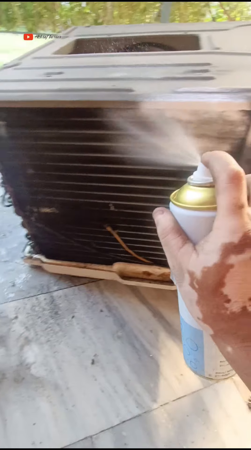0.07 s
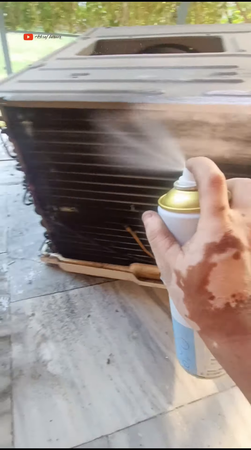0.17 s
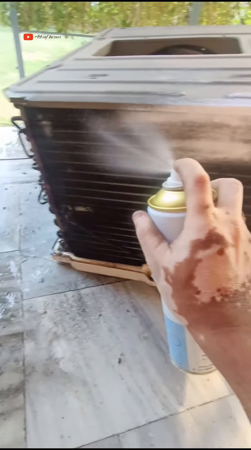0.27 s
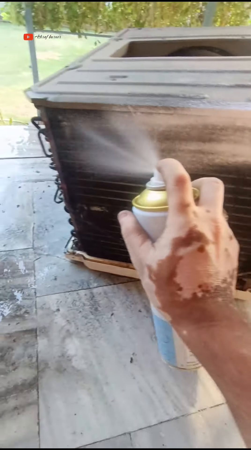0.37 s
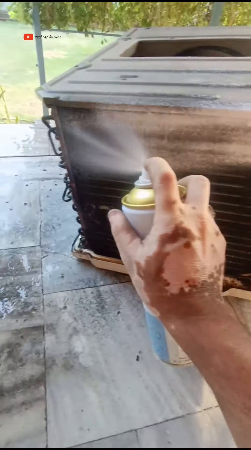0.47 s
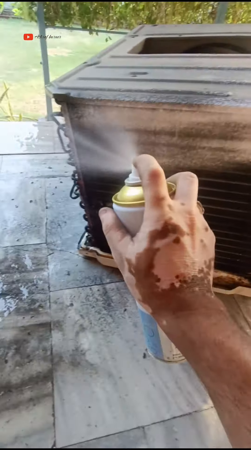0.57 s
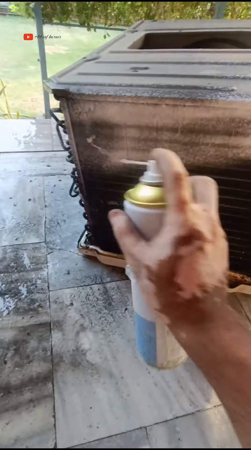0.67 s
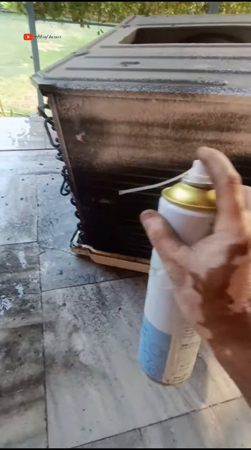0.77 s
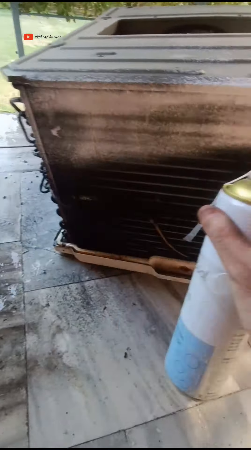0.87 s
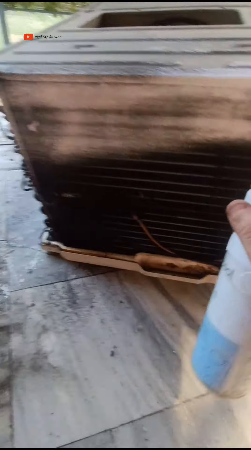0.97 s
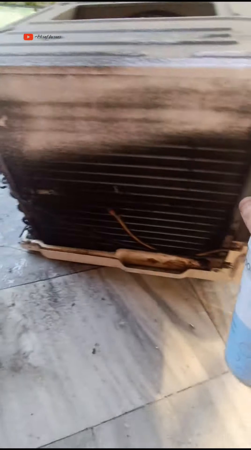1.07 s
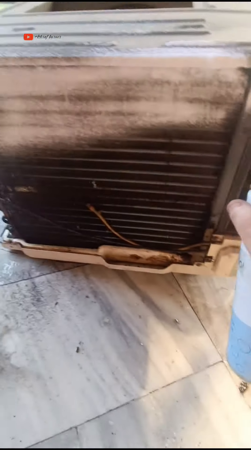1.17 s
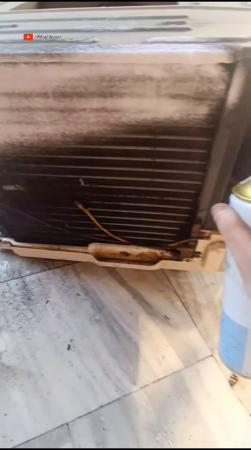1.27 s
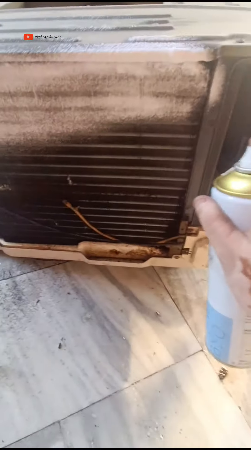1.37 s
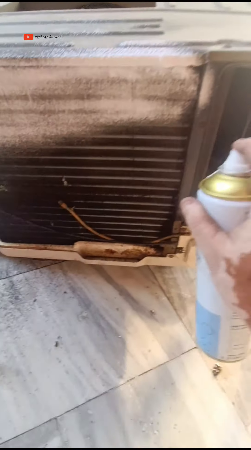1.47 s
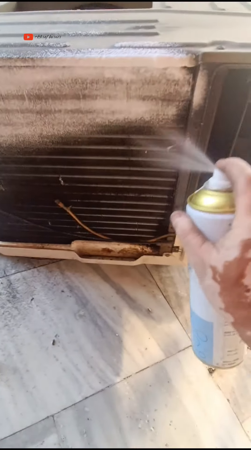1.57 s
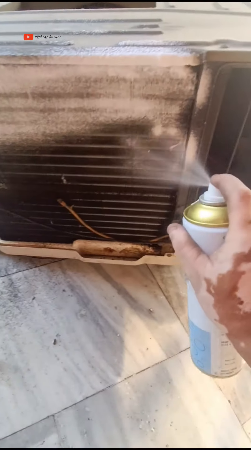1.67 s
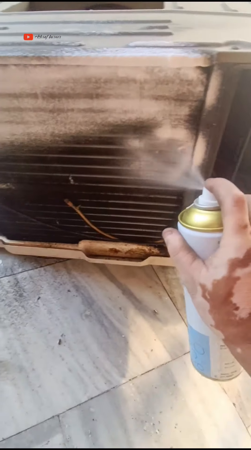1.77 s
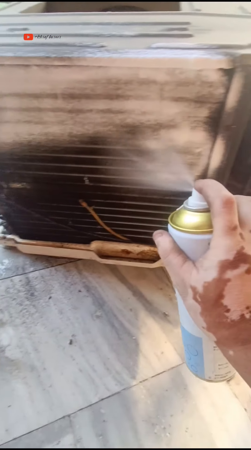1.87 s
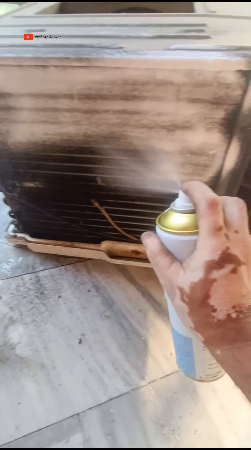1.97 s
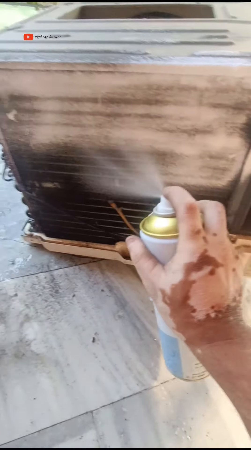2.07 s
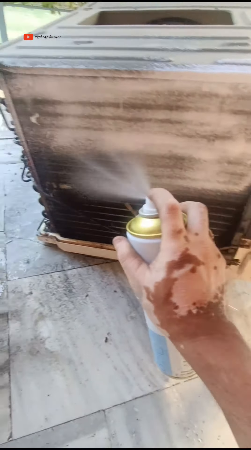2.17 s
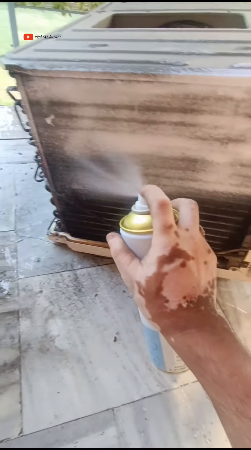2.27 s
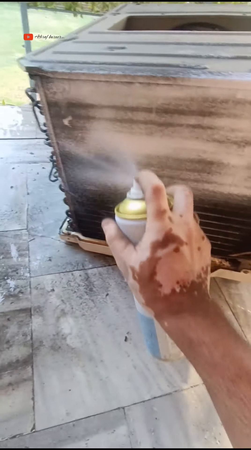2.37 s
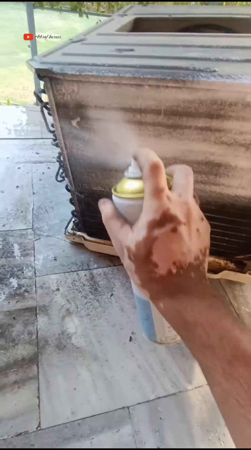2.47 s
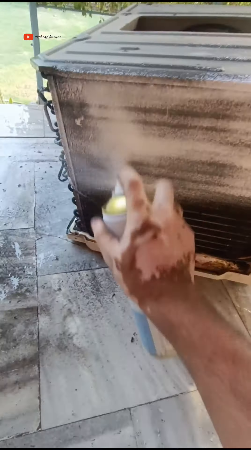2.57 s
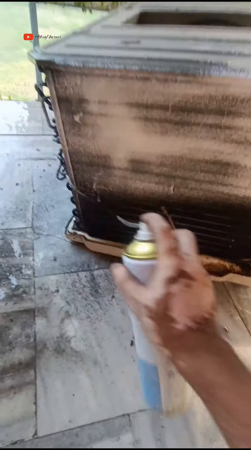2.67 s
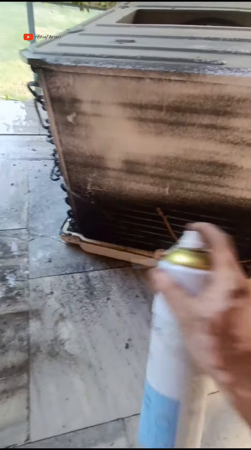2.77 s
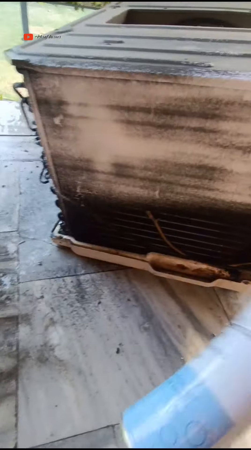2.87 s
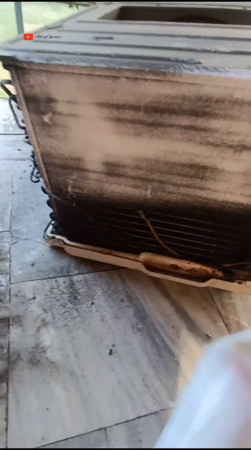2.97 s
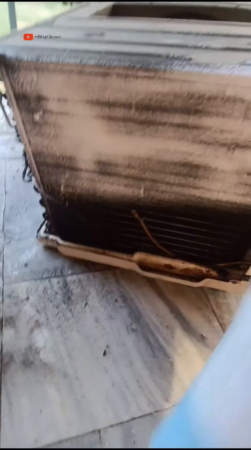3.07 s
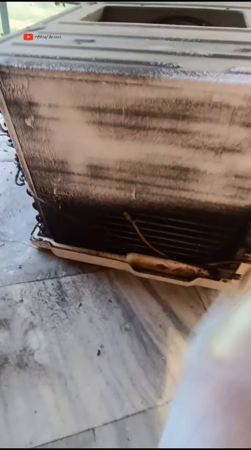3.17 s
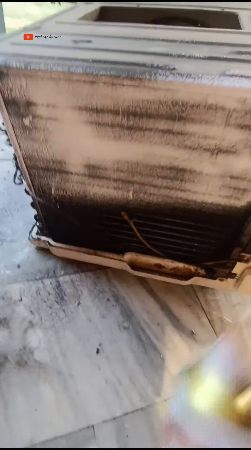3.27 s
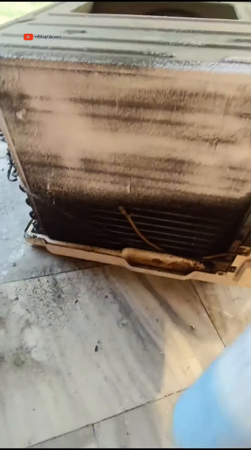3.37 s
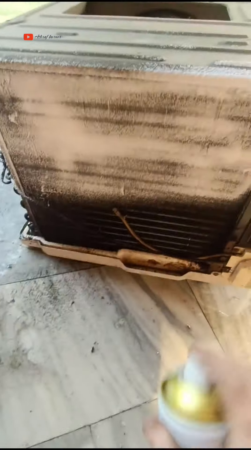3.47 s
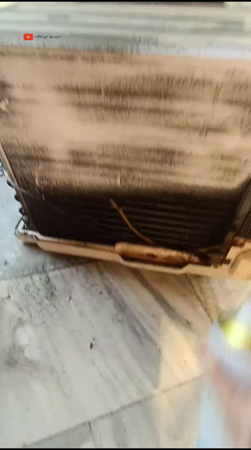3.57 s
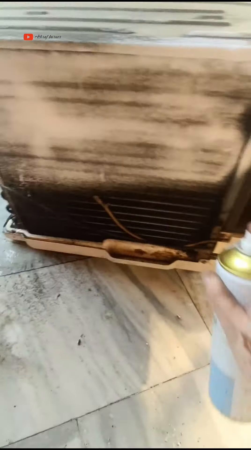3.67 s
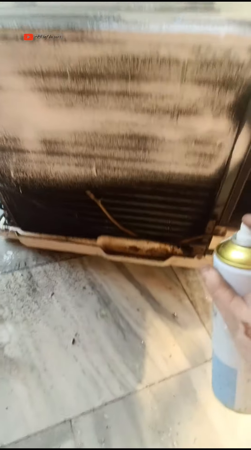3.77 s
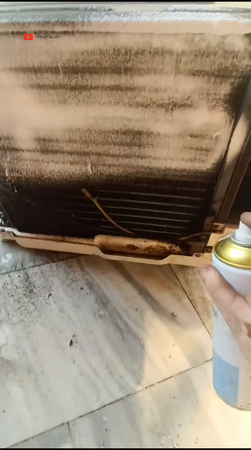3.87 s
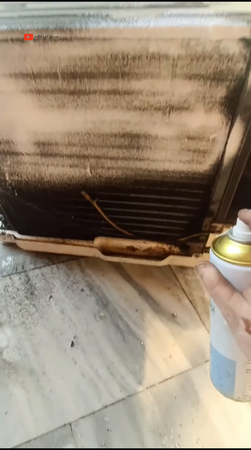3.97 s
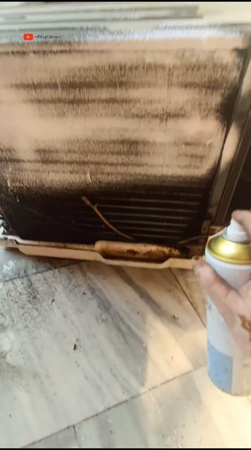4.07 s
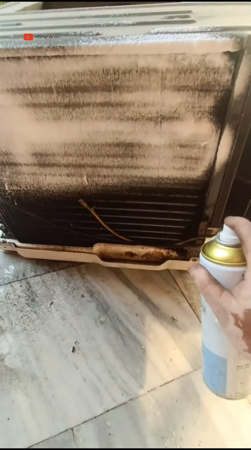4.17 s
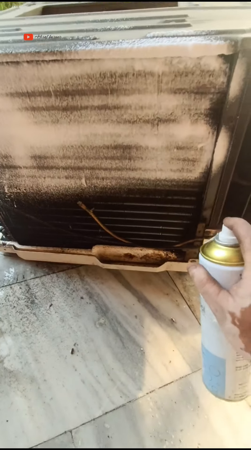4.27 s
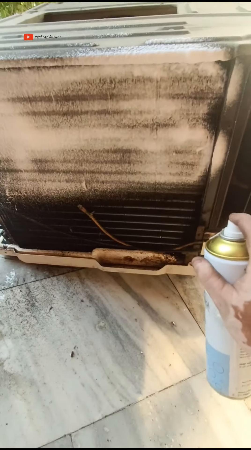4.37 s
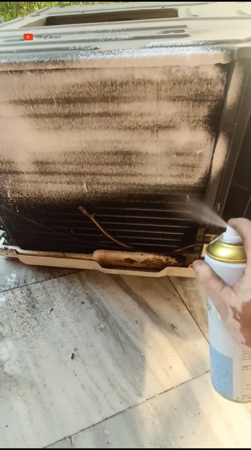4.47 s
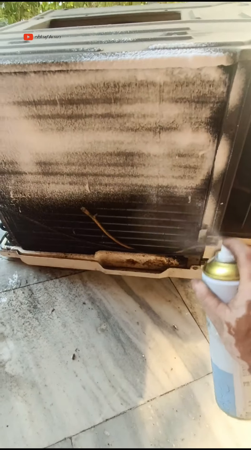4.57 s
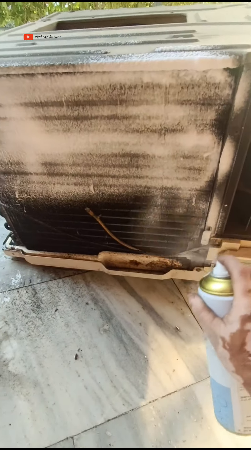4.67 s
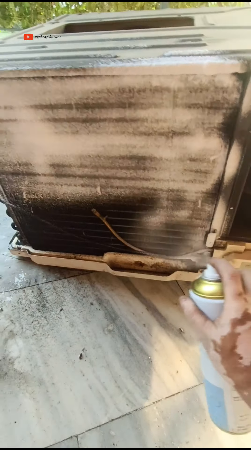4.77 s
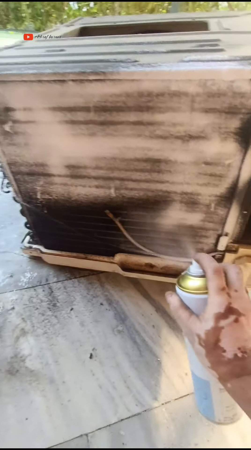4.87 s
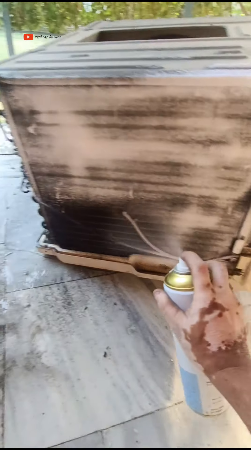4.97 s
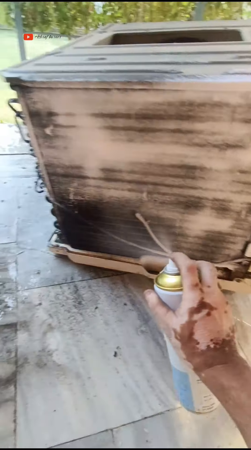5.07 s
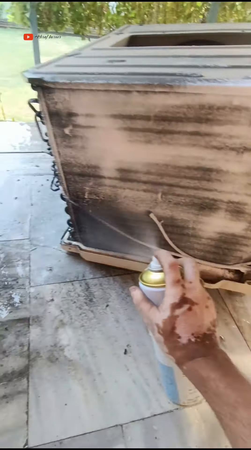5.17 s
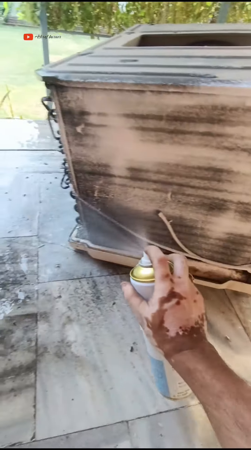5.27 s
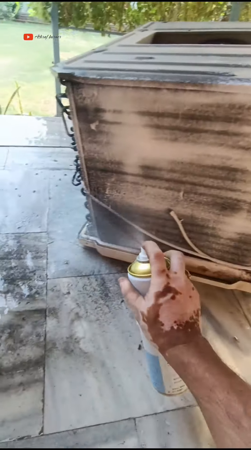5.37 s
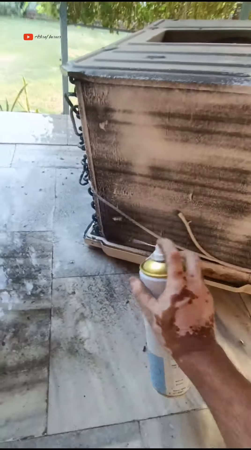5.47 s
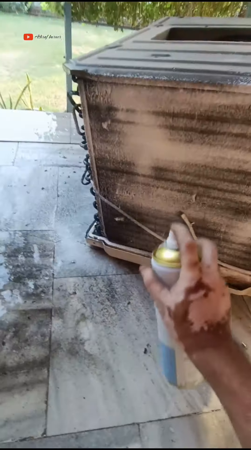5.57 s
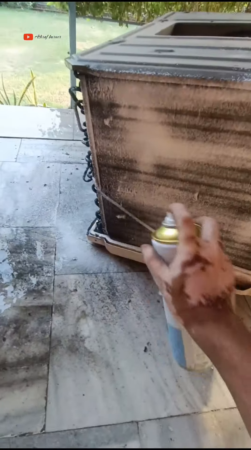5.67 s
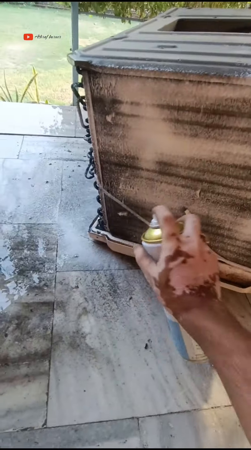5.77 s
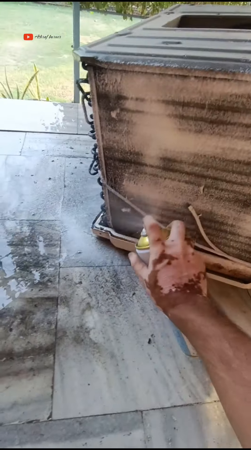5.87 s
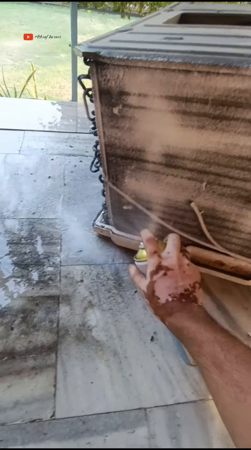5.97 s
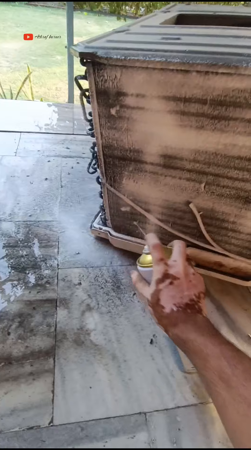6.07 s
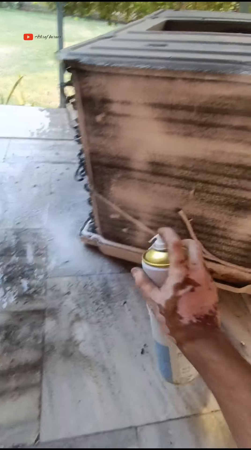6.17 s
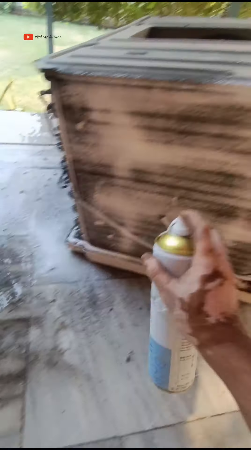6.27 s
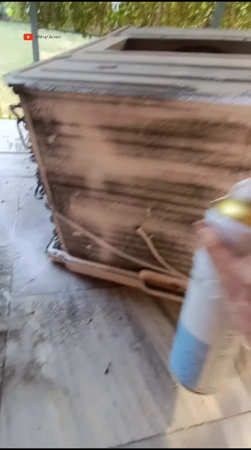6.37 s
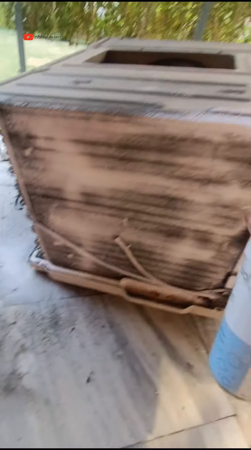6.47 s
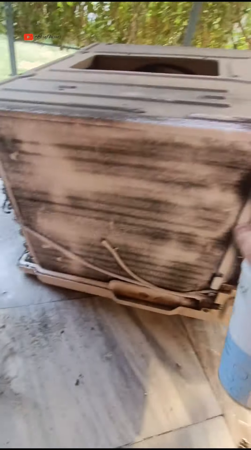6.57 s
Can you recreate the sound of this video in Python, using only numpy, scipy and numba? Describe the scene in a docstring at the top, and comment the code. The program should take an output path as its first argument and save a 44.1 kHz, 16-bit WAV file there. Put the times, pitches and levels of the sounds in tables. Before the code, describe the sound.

Close outdoor phone pickup with a steady low rumble of distant town traffic and a few very faint bird chirps. An aerosol can is already spraying at 0 s: a bright, airy, slightly sputtering hiss, with a quick whistle sliding downward in the first 0.13 s. It weakens gradually and cuts off near 0.8 s. Light ticks lead to a sharp steel ball clack around 0.97 s, then only the rumble. At 1.7 s a spit of liquid opens a second, steady hiss lasting until 2.76 s. From about 3.0 to 4.25 s the can is shaken: uneven metallic rattles and liquid patter, with the loudest cracks at 3.19 and 3.45 s and duller knocks near 3.8 and 4.05 s. A third hiss, spitting at its start, runs from 4.6 to 5.55 s. A brief soft puff follows from 5.98 to 6.2 s, leaving quiet rumble until 6.6 s. Short diffuse reflections trail the can sounds.

```python
"""Outdoors, over a low town rumble and a few faint birds, an aerosol can sprays foam onto a finned coil.
The first burst is under way at the start, its jet a shaped noise with a gliding valve whistle. The can is
then shaken: its ball strikes the steel wall and rings damped modes. A second burst, a longer shaking and two
more bursts follow. A diffuse tail surrounds the can, an arm's length right of a two-port phone."""
import sys
import numpy as np
from scipy import signal
from scipy.fft import rfft, irfft, next_fast_len
from scipy.io import wavfile
from scipy.ndimage import uniform_filter1d, map_coordinates
from numba import njit

SR = 44100
rng = np.random.default_rng(int(sys.argv[2]) if len(sys.argv) > 2 else 0)


def dump_mix(stems):
    """Bounce the given channels to the path in sys.argv[1] as a 16-bit WAV at rate SR."""
    frames = np.atleast_2d(stems).T  # one column per channel
    limited = np.clip(frames, -1, 1)  # hard clip at full scale
    pcm = np.round(limited * 32767).astype(np.int16)
    wavfile.write(sys.argv[1], SR, pcm)


N = 292383
TIME, SIZE = np.arange(N) / SR, next_fast_len(N)
FREQ = np.maximum(np.arange(SIZE // 2 + 1) * SR / SIZE, 1)

# Swings of the can. Each row: start in seconds, end in seconds, treble tilt of the knocks in dB per octave,
# bass tilt in dB per octave (both for a usual blow), liquid level in dB, mean level of small ticks in dB.
SWINGS = [(.80, 0.966, -2.5, -23, -60, -44), (3.063, 3.16, -5, -10, -49, -33),
          (3.177, 3.383, -7, -7, -48, -35), (3.435, 3.56, -9.5, -3.5, -50, -33),
          (3.685, 3.73, -14.5, -1, -60, -42), (3.766, 3.991, -10.5, -6, -49.5, -32),
          (4.038, 4.26, -16, -7.5, -53, -32.5)]


def undb(db):
    """Level in decibels to amplitude ratio."""
    return 10 ** (np.asarray(db) / 20)


def along(table):
    """Spectrum interpolation: a (Hz, value) table read on a logarithmic frequency axis."""
    hz, value = np.transpose(table)
    return np.interp(np.log(FREQ), np.log(hz), value)


def noise(gain, channels=1):
    """Spectral shaping: white noise weighted by a gain at each frequency, scaled to rms 1."""
    white = rng.standard_normal((channels, SIZE))
    shaped = irfft(rfft(white) * gain, SIZE)[:, :N]
    return shaped / np.sqrt(np.mean(shaped ** 2))


def bell(hz, octaves):
    """Band-pass response: a Gaussian on the octave scale around a centre."""
    return np.exp(-.5 * (np.log2(FREQ / hz) / octaves) ** 2)


def walk(rate):
    """Slow random modulation: levels held 1 / rate seconds and smoothed twice, spread near 1."""
    hold = int(SR / rate)
    steps = np.repeat(rng.standard_normal(N // hold + 1), hold)
    smooth = uniform_filter1d(uniform_filter1d(steps, hold), hold)
    return 1.3 * smooth[:N]


def ports(shared, apart, lead_s, alike):
    """Arrival time and partial coherence: the left port hears the source earlier, partly by another path."""
    alike = np.clip(alike, 0, 1)
    ahead = np.round(lead_s * SR).astype(int)
    early = shared[np.clip(np.arange(N) + ahead, 0, N - 1)]
    return np.array([alike * early + np.sqrt(1 - alike ** 2) * apart, shared])


def sides(pan_db):
    """Interaural level difference: left and right gains for left minus right in dB."""
    return undb(np.array([pan_db, -pan_db]) / 2)


@njit
def duck(x, top, ratio, attack, release):
    """Dynamic compression: gain falls quickly when the envelope passes a level and recovers slowly."""
    gain, envelope = np.ones(len(x)), 0.
    for i in range(len(x)):
        envelope += (x[i] - envelope) * (attack if x[i] > envelope else release)
        if envelope > top:
            gain[i] = (top / envelope) ** (1 - 1 / ratio)
    return gain


def town():
    """Diffuse field of traffic and machines: octave bands swell independently, alike at both ports in the bass."""
    # Spectrum of the rumble. Each row: frequency in Hz, relative level in dB per Hz.
    town_spectrum = [(15, -56), (25, -11.5), (96, -4.5), (140, -9), (183, -3), (240, -8.5), (433, -13.5),
                     (509, -21.5), (1140, -25), (2300, -32), (2770, -35), (3830, -35.5), (5730, -51),
                     (8810, -61.5), (15500, -86.5)]
    # Coherence of the ports. Each row: frequency in Hz, likeness of left and right from -1 to 1.
    likeness = [(60, 0.98), (130, 0.99), (290, 0.92), (640, 0.45), (1410, -0.053), (3100, 0.12),
                (6820, -0.2), (15000, 0.2)]
    # Swell of the whole rumble. Each row: time in seconds, level change in dB.
    swell = [(0, 0), (1, 0.5), (1.6, 2.5), (2.3, 2), (3, 0), (4, 0), (5, 1), (5.8, 0), (6.63, 0)]
    level_db = -38.5
    alike = np.clip(along(likeness), -.95, .995)
    spectrum = undb(along(town_spectrum))
    out = 0
    for k in range(10):
        # overlapping bands, one octave apart from 30 Hz
        gain = spectrum * np.cos(np.pi / 2 * np.clip(np.log2(FREQ / 30) - k, -1, 1))
        white = rfft(rng.standard_normal((2, SIZE)))
        mid, side = irfft(white * gain * np.sqrt([1 + alike, 1 - alike]), SIZE)[:, :N]
        band_swell = undb(1.0 * walk(1.5) + 0.87 * walk(9))
        out = out + band_swell * np.array([mid + side, mid - side])
    level = undb(level_db + np.interp(TIME, *np.transpose(swell)))
    return out * level / np.sqrt(np.mean(out ** 2))


def birds():
    """Frequency modulation: far, thin gliding tones, their pitch and level blurred by leaves and air."""
    # Far calls. Each row: start in seconds, length in seconds, start pitch in Hz, end pitch in Hz,
    # mean level in dB, blur as a share of pitch.
    calls = [(1.307, 0.15, 5500, 5900, -69.5, .04), (2.964, 0.092, 5660, 5650, -63, 0.022),
             (6.19, 0.19, 1626, 1624, -58.5, 0.037), (6.32, 0.31, 6680, 6700, -71.5, 0.011),
             (6.57, 0.055, 2310, 2300, -57, 0.017)]
    out = np.zeros((2, N))
    waver, flutter = walk(500), walk(150)
    for start, length_s, start_hz, end_hz, db, blur in calls:
        part = np.clip((TIME - start) / length_s, 0, 1)
        pitch = (start_hz + (end_hz - start_hz) * part) * (1 + blur * waver)
        phase = 2 * np.pi * np.cumsum(pitch) / SR
        envelope = np.abs(np.sin(np.pi * part)) ** 0.27 * (part < 1)
        out += undb(db + 3.5 * flutter) * envelope * np.sin(phase)
    return out


def yard(dry):
    """Diffuse reverberation: fins, paving and wall return a decaying noise tail, another one to each port."""
    t60_s, level_db = 0.39, -12
    t = np.arange(int(.5 * SR)) / SR
    tail = rng.standard_normal((2, len(t))) * np.exp(-np.log(1000) * t / t60_s) * (t > .004)
    # the treble dies sooner
    dull = signal.lfilter([.4], [1, -.6], tail)
    tail = dull + (tail - dull) * np.exp(-t / 0.045)
    tail = tail / np.sqrt((tail ** 2).sum(axis=1, keepdims=True))
    return undb(level_db) * signal.fftconvolve(dry, tail, axes=1)[:, :N]


def small_ticks():
    """Random impacts: faint bounces of the ball in each swing, as (seconds, level in dB, ring in Hz)."""
    # Number of small ticks in each swing.
    tick_counts = [0, 3, 6, 4, 0, 6, 5]
    middle_hz, spread_oct, spread_db = 2680, 0.32, 3.5
    ticks = []
    for (start, end, *_, db), count in zip(SWINGS, tick_counts):
        for _ in range(count):
            moment = start + (end - start) * rng.random()
            level_db = db + spread_db * rng.standard_normal()
            ring_hz = middle_hz * 2 ** (spread_oct * rng.standard_normal())
            ticks.append((moment, level_db, ring_hz))
    return ticks


def blow(ring_hz, treble_db, body_db):
    """Modal impact: a chattering contact drives wall modes that hand and liquid choke; peak 1 at each port."""
    # Modes of the can wall. Each row: nominal frequency in Hz, mean level in dB before the tilts,
    # decay by 60 dB in seconds before the choking limit.
    can_modes = [(1150, -7, 0.0043), (1744, -6.5, 0.0068), (2387, -8, 0.0075), (3200, -6, 0.0069),
                 (3860, -8, 0.006), (4600, -4, 0.0039), (6110, -7, 0.0048), (7500, -6.5, 0.0033),
                 (8410, -3.5, 0.0046), (9960, -11, 0.0038), (12750, -8, 0.0024), (13380, -8, 0.0035)]
    t = np.arange(2200) / SR
    hz, db, t60 = np.array(can_modes + [(ring_hz, -1.0, 30 / ring_hz)]).T[:, :, None]
    # octaves above and below the middle, for the treble and bass tilts
    bright = np.clip(np.log2(hz / 4500), 0, 1.1)
    deep = np.clip(np.log2(3100 / hz), 0, 1.4)
    chance = rng.standard_normal((3, len(hz), 1))
    db = db + treble_db * bright + body_db * deep + 2.0 * chance[0]
    phase = 2 * np.pi * hz * (1 + 0.054 * chance[1]) * t
    sign = (-1) ** np.arange(len(hz))[:, None]
    decay = undb(db) * np.exp(-np.log(1000) * t / np.minimum(t60, .016)) * sign
    # each mode's phase shifts at the onset in the left port only
    onset = 1 - np.exp(-t / 0.00024)
    rings = np.array([decay * np.sin(phase + shift * onset) for shift in (1.6 * chance[2], 0)])
    contact = rng.standard_normal(len(t)) * t / 0.0015 * np.exp(-t / 0.00064)
    # steel on steel pushes more evenly at all frequencies
    push = rfft(contact)
    contact = irfft(push / np.abs(push) ** .6, len(t)) * np.exp(-t / .004)
    contact = contact / np.sqrt(np.sum(contact ** 2))
    # stirred liquid dies away, unlike at the two ports, and drives all modes but the blow's own ring
    stir = 0.037 * rng.standard_normal((2, len(t))) * np.exp(-t / 0.0087)
    knock = signal.fftconvolve(rings.sum(axis=1), contact[None], axes=1)
    stirred = signal.fftconvolve(rings[:, :-1].sum(axis=1), stir, axes=1)
    both = (knock + stirred)[:, :len(t)]
    both = signal.sosfilt(signal.butter(5, 1050, "high", fs=SR, output="sos"), both)
    return both / np.abs(both).max(axis=1, keepdims=True)


def shaking():
    """Impact and agitation: the ball knocks, louder and later at the right port, and liquid patters."""
    # Clear blows of the ball. Each row: time in seconds, peak level in dB midway between the ports,
    # nominal ring frequency in Hz.
    clacks = [(0.8053, -22, 4000), (0.8533, -29, 2130), (0.8779, -29, 4030), (0.905, -26.5, 3540),
              (0.9363, -25.5, 3540), (0.9627, -10, 3470), (0.9696, -31, 3920), (0.9736, -16, 4300),
              (0.977, -5, 6500), (2.985, -33, 2200), (3.074, -26, 5960), (3.0826, -21.5, 2670),
              (3.1017, -26, 2600), (3.1272, -31, 2140), (3.186, 6.5, 4920), (3.1914, 7.5, 3610),
              (3.2036, -10, 2720), (3.245, -5, 2350), (3.2841, -7, 2470), (3.3054, -27, 2390),
              (3.3238, -26, 4150), (3.4015, -19.5, 2400), (3.4395, -22, 3260), (3.4507, 4.5, 4220),
              (3.4685, -16, 2650), (3.4942, -11, 2450), (3.5167, -22, 3150), (3.5223, -9.5, 2540),
              (3.542, -13.5, 1254), (3.5465, -17, 2480), (3.696, -22, 2460), (3.717, -25, 2540),
              (3.7714, -15, 3300), (3.7814, -1.5, 3240), (3.8013, -5, 3340), (3.836, -16.5, 1780),
              (3.8785, -25.5, 1790), (3.91, -29, 1780), (3.921, -20.5, 2560), (3.9396, -22.5, 3530),
              (3.9552, -25.5, 3550), (3.983, -29, 3200), (4.0465, -6, 3240), (4.103, -18, 3000),
              (4.107, -19.5, 3960), (4.1363, -24, 3090), (4.1669, -26.5, 3240), (4.182, -19, 3100),
              (4.2198, -28.5, 3100), (4.2475, -29.5, 3175), (5.896, -40, 2700)]
    # harder blows sound thinner and brighter: tilt change per dB over a usual blow
    usual_blow_db, treble_per_db, body_per_db = -15, 0.17, -0.13
    slosh_rise_s, slosh_dies_db_per_s = 0.027, 299
    out = np.zeros((2, N + 5000))
    starts = [swing[0] for swing in SWINGS]
    for moment, db, ring_hz in clacks + small_ticks():
        treble_db, body_db = SWINGS[np.searchsorted(starts, moment) - 1][2:4]
        hard = db - usual_blow_db
        knock = blow(ring_hz, treble_db + treble_per_db * hard, body_db + body_per_db * hard)
        knock = knock * undb(db) * sides(-6.0)[:, None]
        for ear, lag_s in enumerate((0, .0003)):
            i = int((moment + lag_s) * SR)
            out[ear, i:i + knock.shape[1]] += knock[ear]
    wash = 0
    for start, end, _, _, db, _ in SWINGS:
        rise = np.clip((TIME - start) / slosh_rise_s, 0, 1)
        wash = wash + rise * undb(db - slosh_dies_db_per_s * np.maximum(TIME - end, 0))
    patter = wash * undb(4.5 * walk(300))
    return out[:, :N] + patter * noise(bell(2500, 1.0), channels=2) * sides(-2.0)[:, None]


def burst_controls():
    """Valve flow envelope: quick opening, even drift in dB while held, slower shutting; other columns held."""
    # Presses of the valve. Each row: opening in seconds, shutting in seconds, shutting rate in dB per second,
    # jet level at first in dB, jet level at last in dB, upper hiss over jet in dB, top hiss over jet in dB,
    # nozzle ring over jet in dB, mean left minus right in dB before shading, mean left port lead in ms.
    bursts = [(-.05, 0.79, 400, -30.5, -39, -7.5, -4, -4, -3.5, 0.16),
              (1.694, 2.76, 398, -35, -37, -4, -3.5, -1.5, -3.5, 0.16),
              (4.61, 5.553, 902, -35.5, -36, -6.5, -8.5, 0.5, -6, .33),
              (5.978, 6.193, 480, -36.5, -40, -1.5, -2.5, -1.5, -6, 0.34)]
    opening_s = 0.026
    rows = np.array(bursts)
    # each row takes over 0.1 s before its valve opens
    now = rows[np.maximum(np.searchsorted(rows[:, 0] - .1, TIME) - 1, 0)].T
    opens, shuts, shuts_db_per_s, first_db, last_db = now[:5]
    held = first_db + (last_db - first_db) * np.clip((TIME - opens) / (shuts - opens), 0, 1)
    opening_db = 10 * np.log10(np.clip((TIME - opens) / opening_s, 1e-12, 1))
    jet_db = held + opening_db - shuts_db_per_s * np.maximum(TIME - shuts, 0)
    return (jet_db, *now[5:])


def jet_hiss(controls, sputter, lead_s):
    """Turbulent jet noise: gas and droplets in three parts of one spectrum, each with its own level."""
    # Spectrum of the jet. Each row: frequency in Hz, relative level in dB per Hz.
    jet_spectrum = [(880, -45), (1500, -30), (1910, -27.5), (2210, -17), (3260, -4.5), (3670, -6),
                    (4720, -7.5), (7530, -10.5), (8380, -9.5), (9980, -18.5), (10800, -26), (12500, -17),
                    (13500, -26), (15300, -10), (16000, -24)]
    upper_hz, top_hz = 5000, 9500
    jet_db, upper_db, top_db, _, pan_db = controls
    low = 1 / (1 + (FREQ / upper_hz) ** 8)
    high = 1 / (1 + (top_hz / FREQ) ** 16)
    # share of power, level over the jet in dB, share of the side difference, likeness of the ports;
    # the phone body shades the left port most in the low part
    parts = [(low, 0, 1.0, .75), (1 - low - high, upper_db, .25, .6), (high, top_db, .15, .45)]
    out = 0
    for share, rel_db, shade, alike in parts:
        gain = undb(along(jet_spectrum)) * np.sqrt(np.abs(share))
        pair = ports(*noise(gain, channels=2), lead_s, alike)
        out = out + pair * undb(jet_db + rel_db + sputter + 0.4 * walk(40)) * sides(shade * pan_db)
    return out


def nozzle_ring(controls, sputter, lead_s):
    """Cavity resonance: the jet excites narrow noise bands whose pitch wavers."""
    # Cavities at the nozzle. Each row: centre in Hz, width in octaves, level over the ring level in dB.
    cavities = [(3230, 0.053, -3), (3980, 0.11, -9.5)]
    waver = 0.022  # share of pitch
    jet_db, _, _, ring_db, pan_db = controls
    out = 0
    for hz, octaves, db in cavities:
        # reading the ring faster or slower makes its pitch waver
        reading = np.cumsum(1 + waver * walk(5))
        ring = map_coordinates(noise(bell(hz, octaves))[0], [reading], mode="wrap")
        pair = ports(ring, 0, lead_s, 0.71)
        out = out + pair * undb(jet_db + ring_db + db + sputter) * sides(0.45 * pan_db)
    return out


def half_open_valve(sputter, lead_s):
    """Flow-excited tone and narrow-band hiss: the half-open valve whistles and a sharp band rides on the jet."""
    # Whistle. Each row: time in seconds, mean pitch in Hz, mean level in dB.
    whistle = [(0, 6840, -45), (0.051, 5370, -38.5), (0.076, 4500, -29.5), (0.109, 4090, -33.5),
               (.13, 4000, -60)]
    # Sharp band of hiss. Each row: time in seconds, level in dB before the sputter.
    sharp_levels = [(0, -36), (.09, -39), (.155, -31.5), (.25, -39), (.36, -50)]
    sharp_hz, sharp_oct = 8160, 0.079
    moment, hz, db = np.transpose(whistle)
    pitch = np.interp(TIME, moment, hz) * (1 + .04 * walk(600))
    phase = 2 * np.pi * np.cumsum(pitch) / SR
    tone = np.sin(phase) * undb(np.interp(TIME, moment, db, right=-200) + 3.1 * walk(175))
    sharp = ports(*noise(bell(sharp_hz, sharp_oct), channels=2), lead_s, 0.25)
    sharp_db = np.interp(TIME, *np.transpose(sharp_levels), right=-200)
    return tone + sharp * undb(sharp_db + sputter)


def liquid_spits(pan_db, lead_s):
    """Transient two-phase flow: liquid spat as the valve opens or shuts makes short puffs of noise."""
    # Spits. Each row: centre in seconds, mean level in dB at the centre, Gaussian length in seconds,
    # centre frequency in Hz.
    spits = [(1.721, -26, 0.0079, 3200), (4.633, -24.5, 0.0063, 3280), (5.991, -28.5, 0.0038, 2800),
             (6.24, -48.5, 0.0095, 4500)]
    out = 0
    for moment, db, length_s, hz in spits:
        puff = undb(db + 2.6 * walk(500)) * np.exp(-.5 * ((TIME - moment) / length_s) ** 2)
        spectrum = bell(hz, 0.78) + 0.41 * bell(1034, 0.069)
        out = out + puff * ports(*noise(spectrum, channels=2), lead_s, 0.19) * sides(pan_db)
    return out


def spray():
    """Aeroacoustic superposition: jet, nozzle, valve and spits, most flickering as the foam sputters."""
    jet_db, upper_db, top_db, ring_db, pan_db, lead_ms = burst_controls()
    # the hand sweeps the can along the coil
    lead_s = (lead_ms + 0.03 * walk(2.6)) / 1000
    pan_db = pan_db + 1.16 * walk(4)
    sputter = 0.74 * walk(30) + 0.99 * walk(150) + 0.78 * walk(4.4)  # dB
    controls = jet_db, upper_db, top_db, ring_db, pan_db
    flow = jet_hiss(controls, sputter, lead_s) + nozzle_ring(controls, sputter, lead_s)
    return flow + half_open_valve(sputter, lead_s) + liquid_spits(pan_db, lead_s)


def scene():
    """Linear superposition: the can with its echoes over birds and town."""
    jet, ball = spray(), shaking()
    echoes = yard(jet + undb(-4.5) * ball)
    return jet + ball + echoes + birds() + town()


def record(dry):
    """Compression, saturation and band limiting: the phone lowers its gain when loud, rounds peaks, cuts the top."""
    top_hz, full = 15500, .72
    attack_s, release_s = 0.0034, .5
    loudest = np.abs(dry).max(axis=0)
    gain = duck(loudest, undb(-30.5), 1.204, 1 / (attack_s * SR), 1 / (release_s * SR))
    rounded = full * np.tanh(dry * gain / full)
    return signal.sosfilt(signal.ellip(14, .2, 90, top_hz, fs=SR, output="sos"), rounded)


dry = scene()
out = record(dry)
dump_mix(out)
```